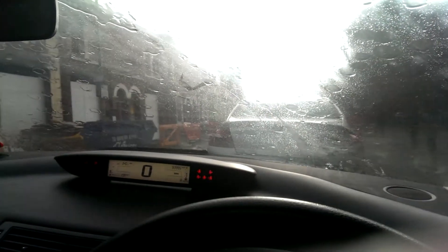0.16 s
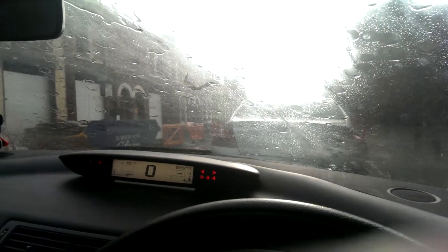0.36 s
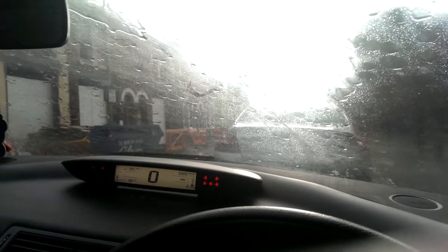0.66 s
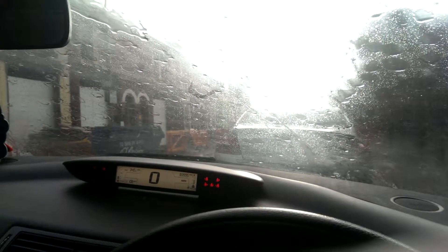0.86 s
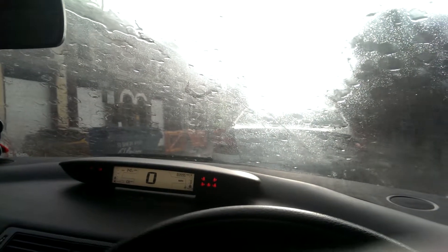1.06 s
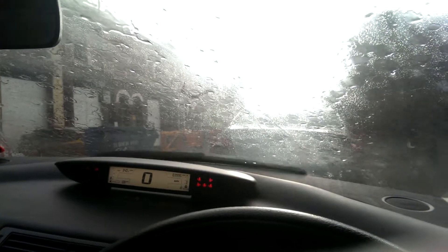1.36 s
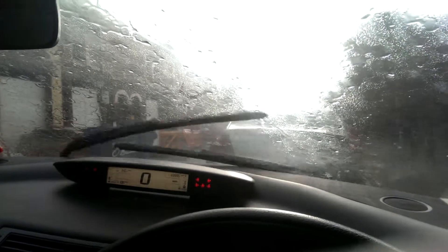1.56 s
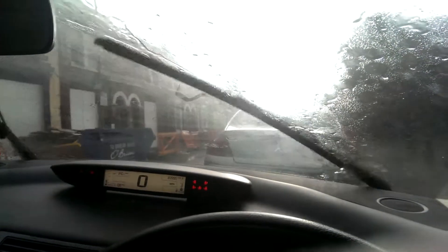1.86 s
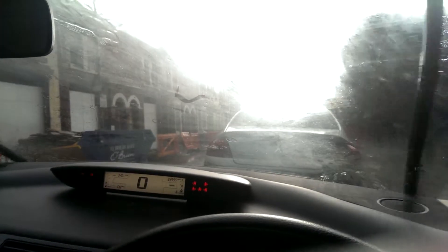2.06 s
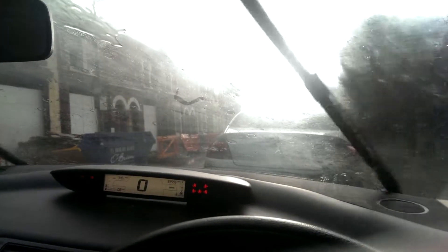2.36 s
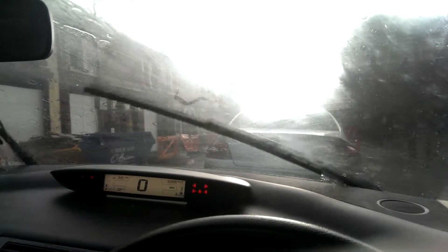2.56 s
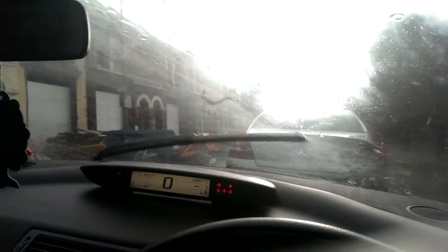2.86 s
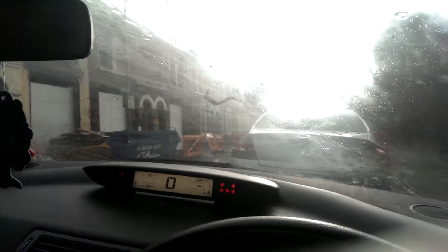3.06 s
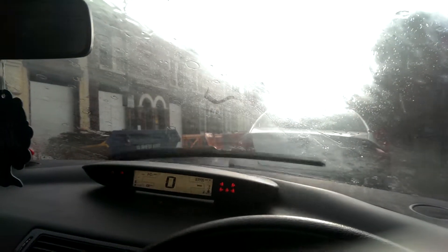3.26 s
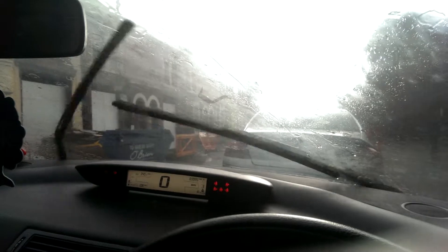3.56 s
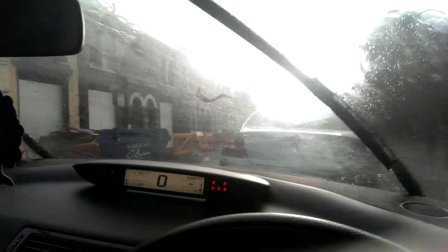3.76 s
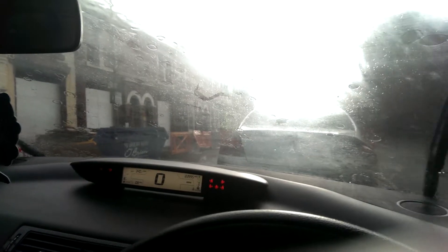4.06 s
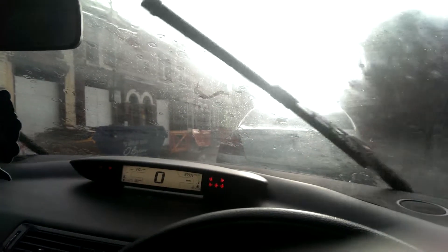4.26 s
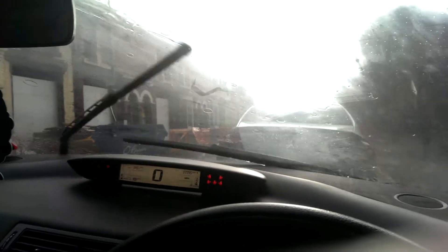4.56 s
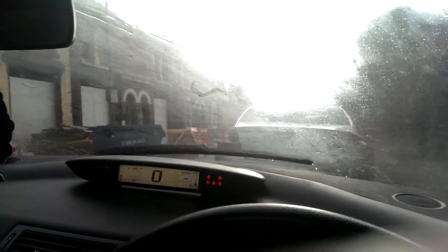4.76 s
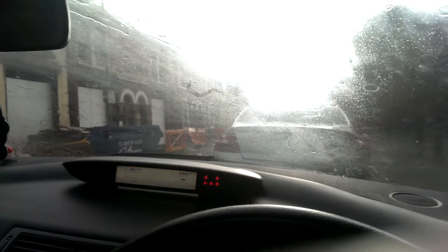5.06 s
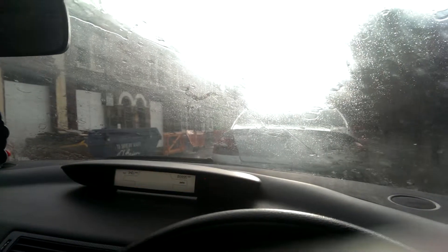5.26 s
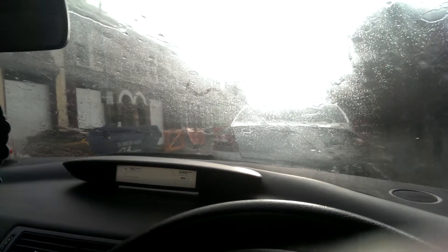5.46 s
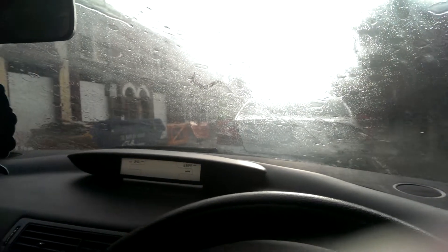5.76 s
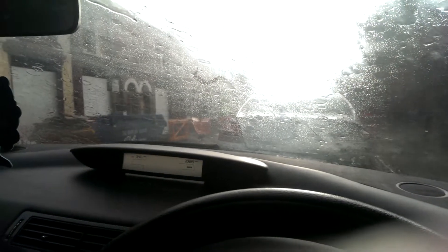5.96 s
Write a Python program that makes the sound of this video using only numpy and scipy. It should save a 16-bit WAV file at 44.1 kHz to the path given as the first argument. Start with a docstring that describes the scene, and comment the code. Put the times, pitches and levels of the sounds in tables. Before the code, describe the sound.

Inside a stationary car, dense rain rattles on glass and roof, with fat drops splatting and wipers thudding and groaning twice.

```python
"""Rain on a parked car

Driver's seat in gusty rain: bright patter on glass, dull drumming on the roof, from dense random impacts.
Fat drops, roof drips and small ticks stand out as single damped noise bursts.
Two wiper sweeps: filtered-noise linkage rumble, stick-slip blade judder, arm thuds as decaying low modes.
Cabin air and faint hiss are steady filtered noise."""
import sys
import numpy as np
from scipy import signal
from scipy.fft import rfft, irfft, next_fast_len
from scipy.io import wavfile
from scipy.ndimage import uniform_filter1d, map_coordinates

SR = 44100
rng = np.random.default_rng(int(sys.argv[2]) if len(sys.argv) > 2 else 0)


def wrap_up_sound(samples):
    """Save the sound to the file named by the first command line argument, as 16-bit audio."""
    columns = np.atleast_2d(samples).T
    # keep every value between -1 and 1, then stretch to whole-number steps
    tamed = np.clip(columns, -1, 1)
    steps = np.round(tamed * 32767).astype(np.int16)
    wavfile.write(sys.argv[1], SR, steps)


N = 270333
TIME = np.arange(N) / SR


def from_db(db):
    """Decibels to amplitude gain."""
    return 10 ** (np.asarray(db) / 20)


def rms_one(x):
    """Scale to unit rms."""
    return x / np.sqrt(np.mean(x ** 2) + 1e-20)


def in_time(rows):
    """Interpolate each column of a time curve at every sample."""
    times_s, *columns = np.transpose(rows)
    return [np.interp(TIME, times_s, column) for column in columns]


def drift(knots_per_s):
    """Smooth random curve through random knots, rms 1."""
    knots = rng.standard_normal(4000)
    return rms_one(map_coordinates(knots, [TIME * knots_per_s], order=2, mode="wrap"))


def held(start_s, end_s, edge_s):
    """Gate with linear edges inside its two times."""
    return np.clip(np.minimum(TIME - start_s, end_s - TIME) / edge_s, 0, 1)


def dying(power, t60_s):
    """Let each energy burst decay exponentially by 60 dB in t60."""
    r = from_db(-120 / (t60_s * SR))  # per-sample power ratio
    return signal.lfilter([1 - r], [1, -r], power + 1e-12)


def coloured(x, spectrum):
    """Filter by gains interpolated over log frequency; one dB column, or one per side."""
    size = next_fast_len(N + 8192)
    log_f = np.log(np.arange(size // 2 + 1) * SR / size + 1)
    hz, *sides = np.transpose(spectrum)
    gain = from_db([np.interp(log_f, np.log(hz), db) for db in sides])
    return irfft(rfft(x, size) * gain, size)[:, :N]


# panel resonances: (centre [Hz], width [Hz], lift [dB])
PANEL_MODES = [(179, 32, 1.5), (415, 110, 4.5), (653, 41, 3), (1116, 190, 1), (1560, 280, 1.5),
               (2020, 150, 1.5), (2930, 170, 0.5)]
# stereo width before the left/right spectrum: (frequency [Hz], side re mid [dB])
STEREO_WIDTH = [(60, -10.5), (130, -23.5), (290, -11.5), (640, -7.5), (1410, 0.5), (3100, -0.5),
                (6820, 0.5), (15000, -1)]


def in_cabin(pair, spectrum):
    """Panels ring on two unrelated signals, mixed as mid and side, then coloured; mid rms 1."""
    for hz, width_hz, lift_db in PANEL_MODES:
        resonance = signal.lfilter(*signal.iirpeak(hz, hz / width_hz, fs=SR), pair)
        pair = pair + (from_db(lift_db) - 1) * resonance
    side = coloured(pair[1], STEREO_WIDTH) * [[1], [-1]]
    out = coloured(pair[0] + side, spectrum)
    return out / (out.mean(axis=0).std() + 1e-12)


def shower(per_s, spread_db, t60_s, tail_db, tail_t60_s, click_db):
    """Random drops of uneven size: click, dense noise ring and cabin echo; levelled to rms 1."""
    sizes = from_db(spread_db * np.minimum(rng.exponential(1, N), 3.5))
    drops = sizes * (rng.random(N) < per_s / SR) / np.sqrt(per_s)
    ring_power = dying(drops ** 2, t60_s)
    echo_power = from_db(tail_db) ** 2 * dying(drops ** 2, tail_t60_s)
    clicks = from_db(click_db) * drops * rng.choice([-1, 1], (2, N))
    out = clicks + np.sqrt(ring_power + echo_power) * rng.standard_normal((2, N))
    return out / np.sqrt(uniform_filter1d(np.mean(out ** 2, axis=0), size=5000) + 1e-12)


def strikes(rows, tail_db, tail_t60_s, size=6000):
    """Impacts (s, dB, left re right dB, t60 s): noise with a fast-decaying ring and a short cabin echo."""
    out, t = np.zeros((2, N + size)), np.arange(size) / SR
    for time_s, db, pan_db, t60_s in rows:
        envelope = np.hypot(from_db(-60 * t / t60_s), from_db(tail_db - 60 * t / tail_t60_s))
        at = int(time_s * SR)
        sides = from_db(db + np.array([[pan_db], [-pan_db]]) / 2)
        out[:, at:at + size] += sides * envelope * rng.standard_normal((2, size))
    return out[:, :N]


# rain strength through the gusts: (time [s], level [dB])
GUST_LEVELS = [(0.0, -30), (0.31, -32.5), (0.42, -35.5), (0.86, -33), (1.22, -36.5), (1.43, -35.5),
               (1.52, -31), (1.76, -33), (1.98, -42.5), (2.5, -37), (2.68, -36.5), (2.87, -44.5),
               (3.22, -40), (3.79, -36.5), (3.91, -37.5), (4.18, -32), (4.46, -37.5), (4.62, -31),
               (4.8, -38.5), (4.96, -40.5), (5.19, -36), (5.38, -38.5), (5.92, -33), (6.12, -35.5)]
# windscreen drops: (frequency [Hz], left gain [dB], right gain [dB])
WINDSCREEN_SPECTRUM = [(460, -22, -36.5), (823, -8.5, -4.5), (1130, -8, -5), (1280, -10.5, -11),
                       (1950, -1.5, -6.5), (2360, -6, -6), (2935, -6, -3), (3630, -9, -10.5),
                       (4570, -14, -20.5), (5350, -26.5, -30.5), (6500, -46, -38), (8070, -52, -44),
                       (11000, -61, -53.5), (15500, -70, -48)]
# side window taps: (frequency [Hz], gain [dB])
SIDE_WINDOW_SPECTRUM = [(800, -25), (2000, -2.5), (3000, -3.5), (3900, 1), (4600, -5), (5300, -16),
                        (6200, -29.5), (7500, -44), (12000, -69)]
# hardest drops on the near glass: (frequency [Hz], gain [dB])
SPATTER_SPECTRUM = [(1500, -14), (4000, 25), (6000, 18), (7200, 7), (9000, -3), (12000, -3), (15000, -4)]
# drops through the roof: (frequency [Hz], left gain [dB], right gain [dB])
ROOF_SPECTRUM = [(25, -37, -30), (85, -36, -32), (110, -4.5, -5.5), (142, -8, -4.5), (171.5, -2.5, 1.5),
                 (206, -6, -3), (286, -4.5, -3), (418, -3, -3.5), (533, -7, -5), (654, -9.5, -3.5),
                 (760, -12, -9.5), (1030, -8, -13.5), (1520, -15.5, -11.5), (2960, -66, -75)]
AVERAGE_SHOWER_DB = -35
FLURRY_RMS_DB, FLURRY_KNOTS_PER_S = 0.77, 16  # quick random swells within a gust
PATTER_DB, WINDOW_DB, ROOF_DB, SPATTER_DB = -35, -44, -36.5, -76.0  # gains in an average shower
ROOF_DB_PER_GUST_DB, SPATTER_DB_PER_GUST_DB = 0.93, 2.1


def rain():
    """Stronger gusts bring more drops: bright on glass, dull through the roof lining."""
    gust_db = in_time(GUST_LEVELS)[0] - AVERAGE_SHOWER_DB + FLURRY_RMS_DB * drift(FLURRY_KNOTS_PER_S)
    per_s = 1000 * from_db(1.3 * gust_db)

    drops = shower(per_s * 1.1, spread_db=4.0, t60_s=0.034, tail_db=6.5, tail_t60_s=0.13, click_db=-4.0)
    patter = from_db(PATTER_DB + gust_db) * in_cabin(drops, WINDSCREEN_SPECTRUM)

    # the side window is close: its fewer drops stand out singly
    taps = shower(per_s * 0.25, spread_db=6.5, t60_s=0.02, tail_db=-16, tail_t60_s=0.11, click_db=-18)
    taps = rms_one(coloured(taps, SIDE_WINDOW_SPECTRUM))
    window = from_db(WINDOW_DB + gust_db) * taps * from_db([[1.5], [-8]])

    # harder impacts are brighter: spatter outgrows patter
    hard = shower(per_s * 0.3, spread_db=6.5, t60_s=0.024, tail_db=-7, tail_t60_s=0.06, click_db=-16)
    hard = coloured(hard, SPATTER_SPECTRUM)
    spatter = from_db(SPATTER_DB + SPATTER_DB_PER_GUST_DB * gust_db) * hard * from_db([[-4], [3]])

    roof = shower(per_s * 1.1, spread_db=2.0, t60_s=0.031, tail_db=1.5, tail_t60_s=0.16, click_db=-5.5)
    drumming = from_db(ROOF_DB + ROOF_DB_PER_GUST_DB * gust_db) * in_cabin(roof, ROOF_SPECTRUM)
    return patter + window + spatter + drumming


# cabin air: (frequency [Hz], gain [dB])
AIR_SPECTRUM = [(15, -59), (30, -20), (70, -17), (120, -17.5), (165, 2), (230, -15.5), (320, -34),
                (600, -63)]


def cabin_air():
    """Steady low-frequency noise, equal on both sides."""
    return from_db(-48.5) * rms_one(coloured(rng.standard_normal(N), AIR_SPECTRUM))


# faint hiss: (frequency [Hz], gain [dB])
HISS_SPECTRUM = [(3000, 4), (8000, 2.5), (12000, 2.5), (16000, -2)]


def faint_hiss():
    """Steady treble noise, independent on each side, stronger on the right."""
    return coloured(rng.standard_normal((2, N)), HISS_SPECTRUM) * from_db([[-80], [-69.5]])


# heavy roof drips: (time [s], relative level [dB])
ROOF_DRIPS = [(0.069, -25), (0.113, -19.5), (1.717, -19), (2.274, -22.5), (2.377, -25.5), (3.029, -20.5),
              (4.636, -16)]
# drip knock: (frequency [Hz], gain [dB])
DRIP_SPECTRUM = [(120, -31), (260, -12), (350, 10.5), (450, 7), (560, -5.5), (900, -10), (2000, -33),
                 (6000, -83)]


def drips():
    """Heavy drips knock hollowly on the roof panel: mid-band noise bursts in mono."""
    rows = [(time_s, db, 0, 0.05) for time_s, db in ROOF_DRIPS]
    knocks = strikes(rows, tail_db=-11, tail_t60_s=0.11)[:1]
    return from_db(5.0) * coloured(knocks, DRIP_SPECTRUM)


# fat drops: (time [s], relative level [dB], left re right [dB])
FAT_DROPS = [(0.19, -10, 2), (0.223, -10, -4), (0.815, -10, 2), (1.065, -11, -1), (1.353, -9.5, 0),
             (1.432, -12, 9.5), (1.6025, -10.5, -3), (2.0908, -15, 1), (2.1857, -14.5, 0.5),
             (2.584, -16, -7), (3.0167, -13.5, -3), (3.2185, -16.5, 0), (3.5685, -15.5, -3),
             (4.0428, -11, -2), (4.127, -19, -3.5), (4.295, -11, -6), (4.3107, -9, -1.5), (4.8441, -16, 0),
             (4.999, -17, -4), (5.118, -7, 2), (5.9154, -8, -1)]
SPLASH_T60_S = 0.082


def splats():
    """Fat drops burst on the windscreen and set the side glass ringing too."""
    rows = [(time_s, db, pan_db, SPLASH_T60_S) for time_s, db, pan_db in FAT_DROPS]
    hits = strikes(rows, tail_db=-25, tail_t60_s=0.079)
    windscreen = coloured(hits, WINDSCREEN_SPECTRUM) * from_db(-3.0)
    side_glass = coloured(hits, SIDE_WINDOW_SPECTRUM) * from_db([[-12], [-23]])
    return windscreen + side_glass


# wiper sweeps: (start [s], blades have turned [s], rumble at the turn [dB])
WIPER_SWEEPS = [(1.227, 2.412, -37), (3.13, 4.263, -35.5)]
# linkage rumble through the body: (frequency [Hz], gain [dB])
RUMBLE_SPECTRUM = [(15, -44), (35, -15), (60, -6.5), (85, -6.5), (105, -11), (130, 8.5), (160, -6),
                   (185, 5), (215, -15), (300, -13), (800, -61), (3000, -100)]
LOAD_RISE_DB_PER_S, LOAD_EDGE_S = 8.5, 0.05  # the load builds as the glass is wiped dry
RETURN_DB, RETURN_S = -13.5, 0.8  # the way back is lighter


def linkage():
    """Linkage noise rumbles under a growing load until the blades have turned, then runs back lightly."""
    load = np.zeros(N)
    for start_s, turned_s, db in WIPER_SWEEPS:
        rise = from_db(LOAD_RISE_DB_PER_S * np.minimum(TIME - turned_s, 0))
        outward = held(start_s, turned_s + LOAD_EDGE_S, LOAD_EDGE_S) * rise
        back = held(turned_s, turned_s + RETURN_S, LOAD_EDGE_S) * from_db(RETURN_DB)
        load += from_db(db) * (outward + back)
    return load * rms_one(coloured(rng.standard_normal(N), RUMBLE_SPECTRUM))


# sharp cabin ticks: (time [s], relative level [dB])
CABIN_TICKS = [(1.3523, -65), (4.294, -60), (4.6174, -67), (4.7656, -62.5), (4.9696, -67), (5.119, -49)]
# tick: (frequency [Hz], gain [dB])
TICK_SPECTRUM = [(600, -12), (1500, 1), (3000, 21), (6500, 13.5), (9000, -15), (12000, -4), (14700, 2),
                 (16000, -4)]


def ticks():
    """Bright, quickly damped noise bursts, close on the right."""
    rows = [(time_s, db, -9.0, 0.055) for time_s, db in CABIN_TICKS]
    return from_db(7.0) * coloured(strikes(rows, tail_db=-20, tail_t60_s=0.08), TICK_SPECTRUM)


# wiper arm thuds: (time [s], relative level [dB])
ARM_THUDS = [(1.454, -17), (1.741, -16), (1.889, -16), (2.315, -5.5), (2.635, -21), (3.141, -20.5),
             (3.716, -12.5), (4.091, -13.5), (4.136, -12), (4.218, -12.5), (4.46, -23)]
# scuttle and cabin modes: (frequency [Hz], relative level [dB], t60 [s])
BOOM_MODES = [(45, -33, .5), (60, -29, .45), (132, -11, .2), (155, -5, .2), (182, -3, .19), (250, -14, .1)]
PUSH_S = 0.01315


def thuds(size=16384):
    """The arms catch and turn over; each push swells into the low modes of the body."""
    out, t = np.zeros(N + size), np.arange(size) / SR
    swell = np.sin(np.pi / 2 * np.clip(t / PUSH_S, 0, 1)) ** 2
    for time_s, db in ARM_THUDS:
        boom = np.zeros(size)
        for hz, level_db, t60_s in BOOM_MODES:
            phase = 2 * np.pi * hz * (t - PUSH_S) + rng.normal(0, 1.0)
            boom += from_db(level_db - 60 * t / t60_s) * np.sin(phase)
        at = int(time_s * SR)
        out[at:at + size] += from_db(db - 7.5) * boom * swell
    return out[:N]


# judder bouts: (start [s], length [s], initial level [dB], initial slip rate [Hz])
JUDDER_BOUTS = [(1.87, 0.15, -36.5, 147), (2.02, 0.071, -28.5, 146), (2.092, 0.06, -31.5, 140),
                (2.18, 0.065, -31, 150), (3.77, 0.273, -29.5, 136)]
# a bout grows and quickens as the blade speeds up
JUDDER_EDGE_S, JUDDER_SWELL_DB_PER_S, SLIPS_RISE_HZ_PER_S = 0.016, 24.5, 66


def judder(rough=0.19, wobble=0.029, second_hz=180, second_db=-12):
    """Rubber sticks and slips on the glass, shaking the arm almost sinusoidally."""
    force, slips_hz = np.zeros(N), np.zeros(N)
    for start_s, length_s, db, hz in JUDDER_BOUTS:
        age_s = np.clip(TIME - start_s, 0, length_s)
        gate = held(start_s, start_s + length_s, JUDDER_EDGE_S)
        force += gate * from_db(db + JUDDER_SWELL_DB_PER_S * age_s)
        slips_hz = np.where(gate > 0, hz + SLIPS_RISE_HZ_PER_S * age_s, slips_hz)
    # the other blade slips at its own rate; the two beat
    shake = np.zeros(N)
    for blade_hz, level_db in ((slips_hz, 0), (second_hz, second_db)):
        phase = 2 * np.pi * np.cumsum(blade_hz * (1 + wobble * drift(50))) / SR
        shake += from_db(level_db) * np.sqrt(2) * np.sin(phase) * (1 + rough * drift(90))
    return force * shake


def scene():
    """Rain all around, wipers ahead, a quiet floor beneath."""
    wipers = (linkage() + thuds() + judder()) * from_db([[-1.0], [0.9]])
    floor = cabin_air() + faint_hiss()
    return rain() + floor + drips() + splats() + ticks() + wipers


CUTOFF_HZ = 15800


def record(dry):
    """Cut the top steeply with an elliptic low-pass."""
    lowpass = signal.ellip(10, 0.1, 90, CUTOFF_HZ, fs=SR, output="sos")  # ripple 0.1 dB, stopband -90 dB
    return signal.sosfilt(lowpass, dry)


dry = scene()
out = record(dry)
wrap_up_sound(out)
```